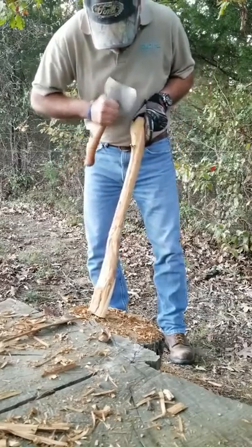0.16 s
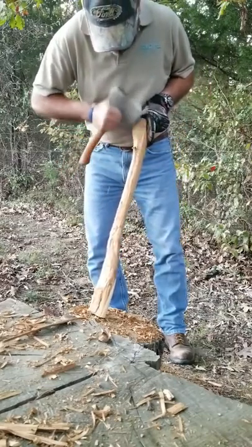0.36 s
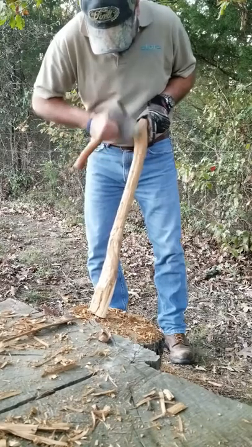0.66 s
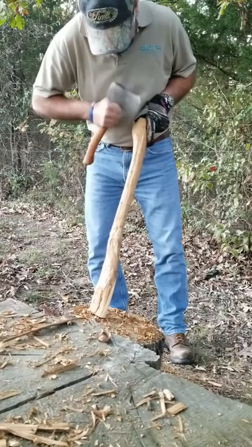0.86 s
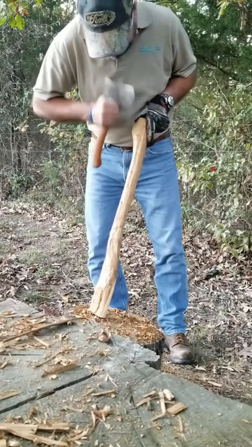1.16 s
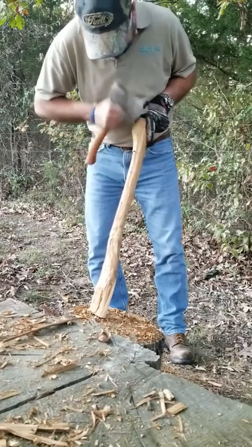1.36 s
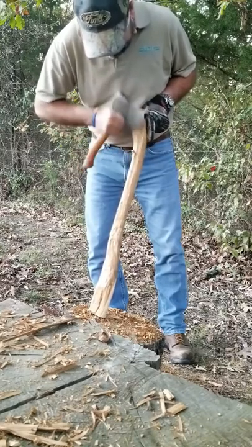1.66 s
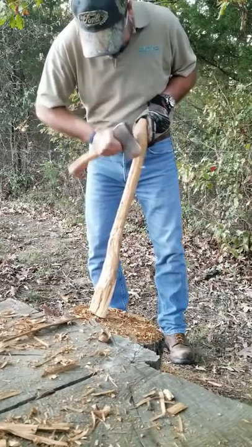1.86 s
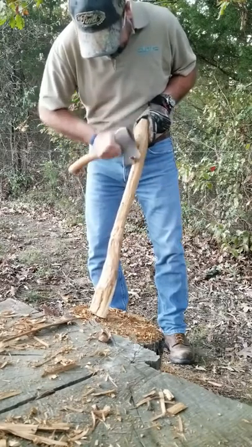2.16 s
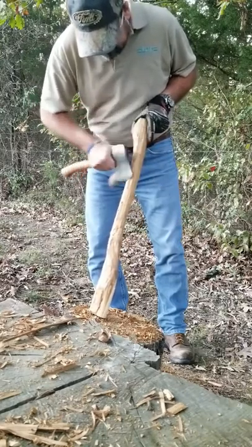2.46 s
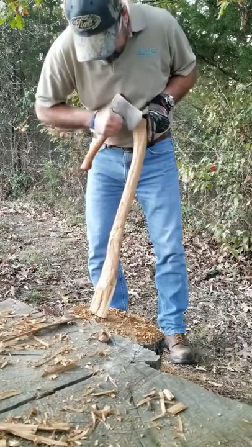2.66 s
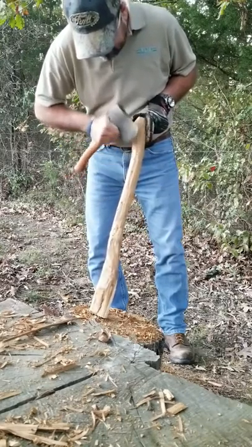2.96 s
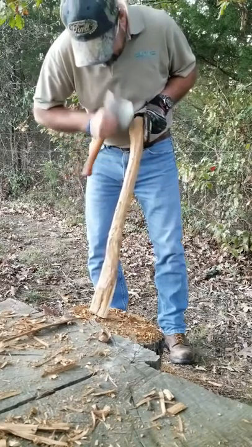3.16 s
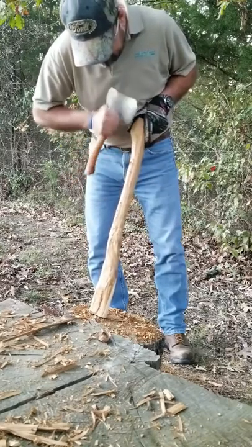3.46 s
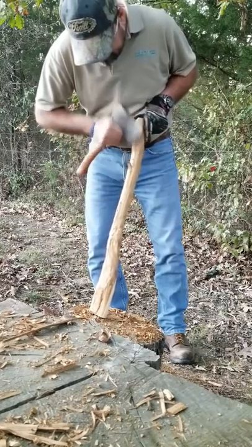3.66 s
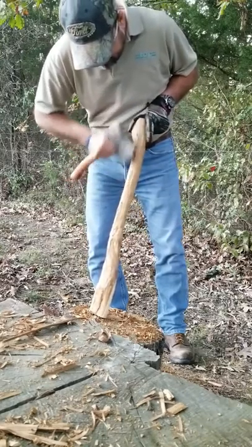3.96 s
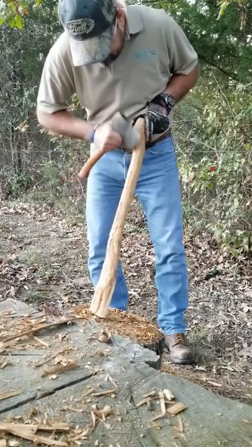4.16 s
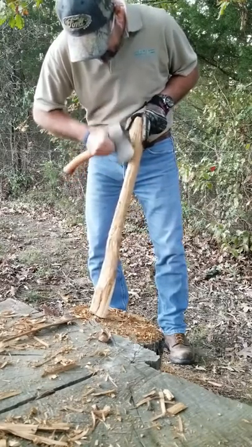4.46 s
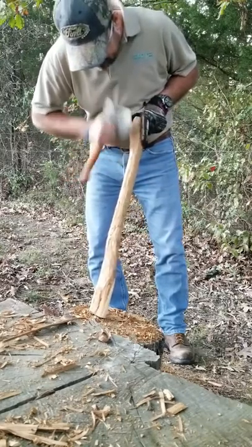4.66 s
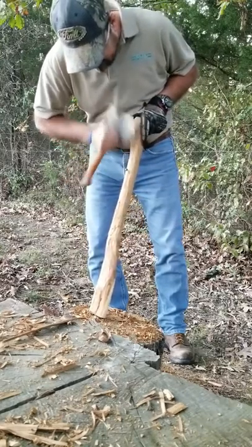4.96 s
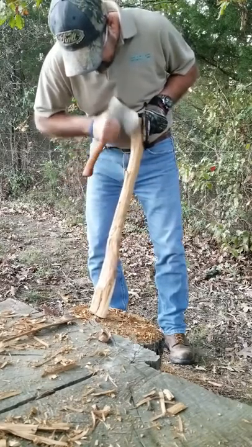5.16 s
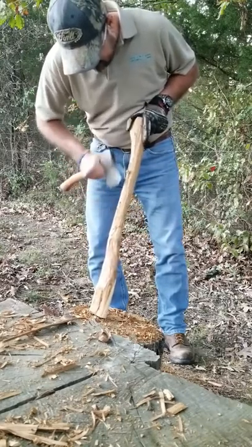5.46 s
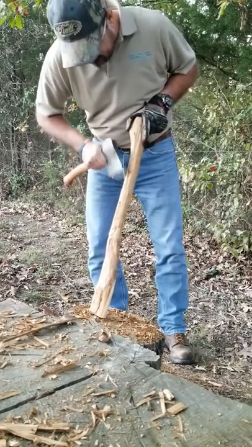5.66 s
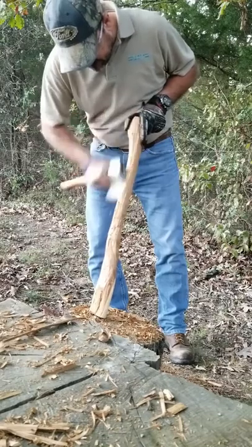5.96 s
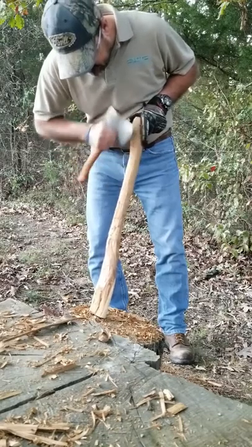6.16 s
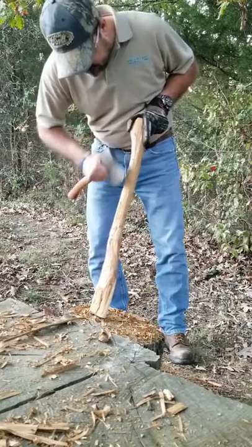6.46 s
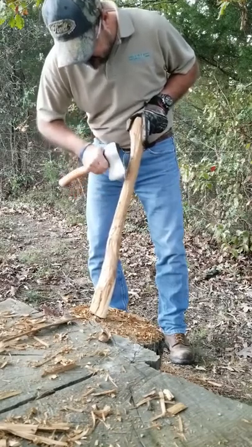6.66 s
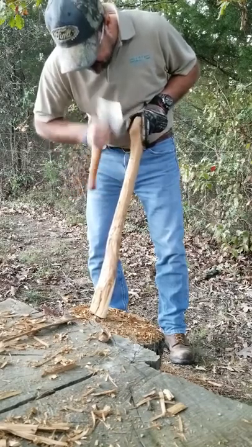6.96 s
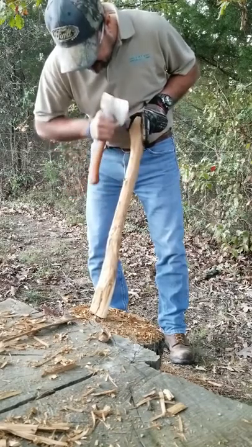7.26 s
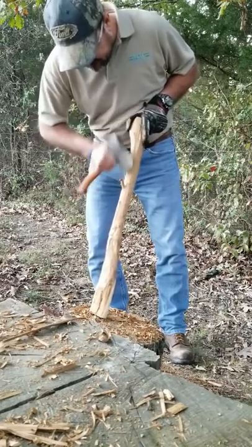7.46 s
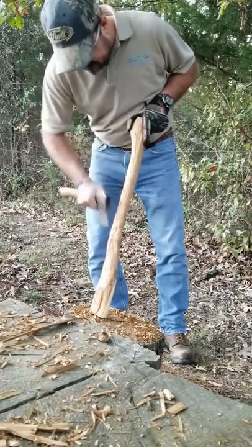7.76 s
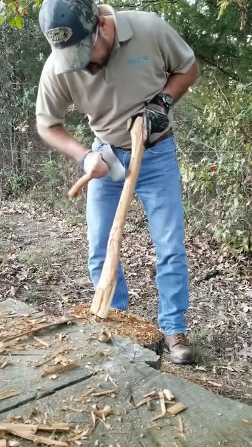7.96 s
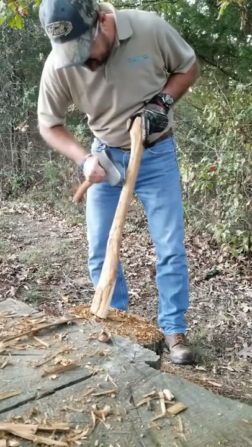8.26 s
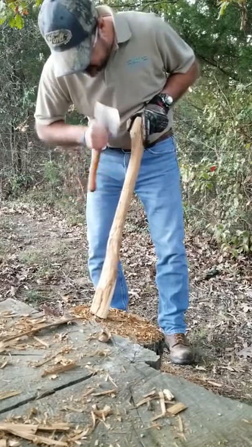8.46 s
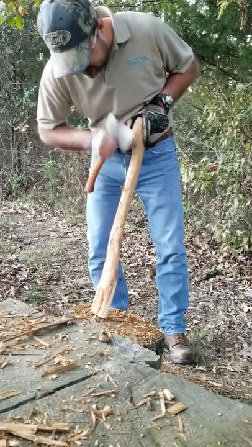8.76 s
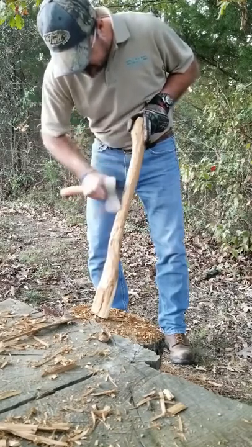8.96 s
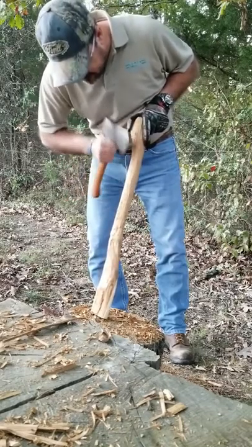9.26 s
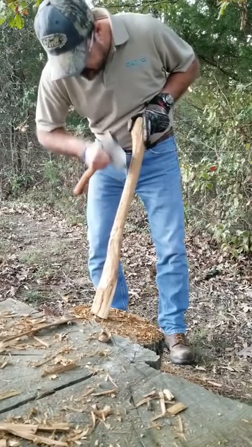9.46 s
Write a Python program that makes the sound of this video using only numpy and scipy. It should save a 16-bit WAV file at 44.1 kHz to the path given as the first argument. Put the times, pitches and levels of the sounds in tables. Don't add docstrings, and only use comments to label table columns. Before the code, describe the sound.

Outdoors among trees, a hatchet trims a dry hardwood pole standing on a stump. Sharp, woody whacks come about three a second in short runs with brief gaps. Each cracks fibres, rings pole and steel briefly, thumps the stump and scatters a short echo. Chips tick into dry leaves, crickets trill faintly, and distant traffic and a fading engine hum lie beneath. Close phone-like stereo microphones, slight hiss.

```python
import sys
import numpy as np
from scipy import signal
from scipy.io import wavfile
from scipy.ndimage import uniform_filter1d

SR = 44100
rng = np.random.default_rng(int(sys.argv[2]) if len(sys.argv) > 2 else 0)


def decibels_to_gain(level_db):
    exponent = np.asarray(level_db, float) / 20
    return 10 ** exponent


def wrap_up_sound(samples):
    columns = np.atleast_2d(samples).T
    tamed = np.clip(columns, -1, 1)
    steps = np.round(tamed * 32767).astype(np.int16)
    wavfile.write(sys.argv[1], SR, steps)


N = 423360

# f/Hz, correlation/-1..1
LIKENESS = [(60, 0.98), (130, 0.94), (290, 0.93), (640, 0.66), (1410, 0.69), (3100, 0.09), (6820, -0.08),
            (15000, -0.42)]
# f/Hz, left over right/dB
PORT_SHADE = [(300, 9.5), (1300, -1.5), (2400, 0), (4400, 4), (6000, 6.5), (8000, 12.5), (10000, 15),
              (12500, 14.5), (15000, 24)]
# f/Hz, level/dB, t60/s, left over right/dB
POLE_MODES = [(1217.7, -8.5, 0.076, -12), (1374, -8.5, 0.036, 7.5), (1019, -4.5, 0.0041, 6.5),
              (1600, -12.5, 0.0073, 0.5)]
UPPER_MODES = [(1790, 1.5, 0.047, -1.5), (2003, -14.5, 0.12, -5), (2140, -13, .04, 12),
               (2615, -13.5, 0.077, 1.5), (3220, -13, 0.048, -4)]
STEEL_MODES = [(7723, -4, 0.043, 20), (8000, -7, 0.037, 14)]
# f/Hz, level/dB per Hz
CRACK_COLOUR = [(880, -34.5), (1500, -8.5), (1820, -3.5), (2400, -18.5), (2700, -11.5), (2940, -16),
                (4630, -5.5), (6360, -21.5), (7890, -20.5), (9500, -42.5), (12400, -76), (20900, -120)]
# f/Hz, level/dB per Hz
SPLINTER_COLOUR = [(8000, -30.5), (9500, -2.5), (12000, 7), (15600, -3.5), (16600, -26.5)]


def evened(x):
    return x / np.sqrt(np.mean(x ** 2) + 1e-20)


def read(points, hz):
    f, value = np.transpose(points)
    return np.interp(np.log(hz + 1), np.log(f + 1), value)


def add(mix, s, sound):
    at = round(s * SR)
    part, sound = mix[:, max(at, 0):], sound[:, max(-at, 0):]
    count = min(part.shape[1], sound.shape[1])
    part[:, :count] += sound[:, :count]


def coloured(x, points, scale=1):
    hz = abs(np.fft.fftfreq(2 ** 11, 1 / SR))
    log_gain = scale * read(points, hz) * np.log(10) / 20
    response = np.exp(np.conj(signal.hilbert(log_gain)))
    taps = np.fft.ifft(response).real[:2 ** 10]
    return signal.oaconvolve(x, taps)[:len(x)]


def at_ports(x):
    return np.array([coloured(x, PORT_SHADE, .5), coloured(x, PORT_SHADE, -.5)])


def crackle(count, per_s):
    size = decibels_to_gain(3 * np.minimum(rng.exponential(1, count), 3))
    snaps = size * (rng.random(count) < per_s / SR)
    return evened(rng.standard_normal(count) * (.5 + snaps))


def diffuse(hz, frames, least_likeness):
    a, b, c, d = rng.standard_normal((4, len(hz), frames))
    same = np.clip(read(LIKENESS, hz), least_likeness, 1)
    left, other = a + 1j * b, c + 1j * d
    return np.array([left, same * left + np.sqrt(1 - same ** 2) * other])


def ring(modes, t, rise_s):
    hz, db, t60, pan_db = np.transpose(modes)[:, :, None]
    a, b, c = rng.standard_normal((3, len(modes), 1))
    hz, db = hz * (1 + .01 * b), db + 1.8 * a
    lag = np.minimum(hz / 1200, .6) * (.6 + .4 * c)
    size = decibels_to_gain(db - 60 * t / t60) * (1 - np.exp(-t / rise_s))
    turn = 2 * np.pi * hz * t
    left = size * decibels_to_gain(pan_db / 2) * np.sin(turn)
    right = size * decibels_to_gain(-pan_db / 2) * np.sin(turn - lag)
    return np.array([left.sum(0), right.sum(0)])


def traffic_and_hiss():
    # f/Hz, level/dB per Hz
    traffic_colour = [(20, -9), (40, -6.5), (85, 2), (125, -5.5), (190, -6), (260, -16), (400, -13),
                      (520, -12), (680, -8), (870, -9), (1050, -21.5), (1230, -20.5), (1400, -36),
                      (3000, -46.5)]
    # t/s, level/dB
    traffic_swell = [(0.0, -57), (1.47, -59), (2.03, -58), (2.75, -62.5), (3.23, -58.5), (4.33, -62),
                     (4.87, -61), (6.9, -61), (7.19, -61), (8.26, -63), (8.53, -62), (9.6, -60)]
    # f/Hz, level/dB per Hz
    hiss_colour = [(2500, -128), (5000, -128), (9000, -128), (15500, -126), (16600, -140)]
    frames, hz = N // 256 + 5, np.fft.rfftfreq(1024, 1 / SR)[:, None]
    patches = rng.standard_normal((len(hz), frames))
    patches = evened(uniform_filter1d(uniform_filter1d(patches, 5, 0), 20, 1))
    s, swell = np.transpose(traffic_swell)
    swell_db = np.interp(np.arange(frames) * 256 / SR, s, swell - swell.mean())
    rumble_db, roar_db = -63 + 1.5 * swell_db, -66.5 + .9 * swell_db
    share = np.clip(np.log2(hz / 220 + 1e-9), 0, 1)
    level_db = (1 - share) * rumble_db + share * roar_db
    road = decibels_to_gain(read(traffic_colour, hz) + level_db + 1.5 * patches) * (hz < 3000)
    size = np.hypot(road, decibels_to_gain(read(hiss_colour, hz) + 25))
    noise = signal.istft(diffuse(hz, frames, -1) * size, nperseg=1024, noverlap=768)[1]
    return noise[:, :N] * decibels_to_gain([[.8], [-.8]])


def engine_drone():
    # t/s, level/dB
    drone_level = [(0, -71), (1, -65), (2.3, -74.5), (3.3, -76.5), (9.6, -81)]
    # f/Hz, level/dB
    drone_tones = [(193, 1.5), (470, -3.5)]
    waver = 1 + 0.022 * evened(uniform_filter1d(rng.standard_normal(N), 9000))
    seconds = np.cumsum(waver) / SR
    drone = sum(decibels_to_gain(db) * np.sin(2 * np.pi * f * seconds) for f, db in drone_tones)
    return drone * decibels_to_gain(np.interp(np.arange(N) / SR, *np.transpose(drone_level)))


def trill(length_s, hz, per_s, db, blur, warm_up):
    t = np.arange(0, length_s, 1 / SR)
    stroke = (t * per_s) % 1
    pulses = np.sin(np.pi * np.clip(stroke / .6, 0, 1))
    pitch = hz * (1 - warm_up * np.exp(-t / .12))
    glide = pitch * (1 - 0.013 * (stroke - .3))
    clear = np.sin(2 * np.pi * np.cumsum(glide) / SR + np.array([[0], [1.5]]))
    drift = rng.standard_normal((2, 2, SR))[..., :len(t)]
    drift = uniform_filter1d(uniform_filter1d(drift, size=220), size=220)
    turn = 2 * np.pi * np.cumsum(pitch) / SR
    fuzzy = evened(drift[0] * np.sin(turn) + drift[1] * np.cos(turn))
    mush = np.clip(blur + .4, 0, 1)
    song = (1 - mush) * clear * pulses + mush * fuzzy * (.5 + .5 * pulses)
    fade_s = np.minimum(.3 * blur ** 2 + .002, .15)
    fade = np.clip(np.minimum(t, t[-1] - t) / fade_s, 0, 1)
    return decibels_to_gain(db) * evened(song) * fade


def crickets():
    # f/Hz, level/dB
    chorus = [(3708, -81.5), (3984, -86.5)]
    # f/Hz, trill length/s, blur of distance/0..1
    far_singers = [(4090, .42, .25), (3890, .45, .2), (3860, .52, .4), (4040, .5, .5)]
    far_levels = [-71, -68, -74.5, -76]
    far_starts = [(2.82, 5.4, 8.35), (2.81, 5.55, 8.26), (2.4, 4.5, 7.2, 9.4), (.3, .75, 3.3, 6.1, 9.26)]
    # f/Hz, pulse rate/Hz, trill length/s, trill starts t/s
    near_singers = [(3910, 36.3, .363, (1.055, 3.682, 6.832)),
                    (3740, 33.4, .495, (1.3, 3.771, 6.096, 8.781))]
    near_levels = [-61, -64.5]
    out, far_per_s = np.zeros((2, N)), 33.4
    for hz, db in chorus:
        for s in np.arange(-.2, N / SR, .8):
            add(out, s, trill(.95, hz, far_per_s, db, .8, 0))
    for (hz, length_s, blur), db, starts in zip(far_singers, far_levels, far_starts):
        for s in starts:
            add(out, s, trill(length_s, hz, far_per_s, db, blur, .022))
    for (hz, per_s, length_s, starts), db in zip(near_singers, near_levels):
        for s in starts:
            add(out, s, trill(length_s, hz, per_s, db, -.22, 0))
    return out


def trees(place, deeper_db):
    # f/Hz, level/dB per Hz
    echo_colour = [(250, -10), (700, -22.5), (1050, -6.5), (1200, -3.5), (1400, -8), (1780, -8),
                   (2300, -10.5), (2640, -18), (2900, -16), (3500, -9.5), (4800, -18), (6400, -32),
                   (7700, -27), (9400, -41)]
    echo_top = [(15300, -30), (16600, -50)]
    # f/Hz, t60/s
    tree_decay = [(150, 0.63), (600, 0.16), (1200, 0.53), (2500, .45), (4000, 0.48), (8000, 0.23),
                  (14000, 0.44)]
    # f/Hz, level/dB, extra for a high blow/dB
    lingering = [(1157, 7.5, -3.5), (1777, 8.5, 6), (2690, 6.5, 3), (3520, 5.5, -1.75), (7650, 9, 0.5)]
    hz, t = np.fft.rfftfreq(1024, 1 / SR)[:, None], np.arange(88) * 256 / SR
    level_db = read(echo_colour + echo_top, hz) - 60 * (t - .12) / read(tree_decay, hz)
    patches = uniform_filter1d(rng.standard_normal((len(hz), len(t))), size=8, axis=0)
    level_db += 3 * evened(uniform_filter1d(patches, size=8, axis=1))
    level_db += .1 * deeper_db * np.log2(np.clip(hz / 2000, 1, 8))
    for f, db, high_db in lingering:
        level_db += (db + high_db * place) / (1 + ((hz - f) / 35) ** 2)
    shade_db = np.array([.2, -.2])[:, None, None] * read(PORT_SHADE, hz)
    z = diffuse(hz, len(t), 0) * decibels_to_gain(level_db - 3.5 + shade_db)
    tail = signal.istft(z, nperseg=1024, noverlap=768)[1]
    return tail * (1 - np.exp(-(np.arange(tail.shape[1]) / SR / 0.0027) ** 2))


def chop(t, force_db, thump_db, place):
    # f/Hz, level/dB, t60/s, left over right/dB
    lower_modes = [(1113, 9.5, 0.037, 7.5), (1050, -3.5, .025, 6)]
    whole_modes = [(1202, -29, 0.3, -6.5), (1708, -34.5, .35, -1)]
    stump_modes = [(140.7, 9.5, 0.068, -1.5), (218, -1.5, 0.048, -7.5)]
    cut_s, land_s = .00035, .0015
    late = np.maximum(t - cut_s, 0)
    hold_s = np.clip(0.056 + 0.12 * max(-place, 0), .03, .16)
    grip = decibels_to_gain(60 * t / 0.078 - 60 * t / hold_s)
    wood = ring(POLE_MODES, late, 0.00065) * grip
    wood += decibels_to_gain(-14.5 - 0.5 * place) * ring(lower_modes, late, 0.0016)
    wood += decibels_to_gain(-7.5 + 7 * place) * ring(UPPER_MODES, late, .001)
    wood += decibels_to_gain(-3 * place) * ring(whole_modes, late, .01) * (1 - t / t[-1]) ** .5
    slap = np.exp(-((t - land_s) / 0.00046) ** 2) * np.cos(2 * np.pi * 1100 * (t - land_s))
    wood += decibels_to_gain(-5.5 + np.array([[2.], [-2.]])) * slap
    thump = ring(stump_modes, np.maximum(t - .006, 0), 0.025)
    return decibels_to_gain(force_db + 4.5) * wood + decibels_to_gain(thump_db + 11.0) * thump


def bite(t, crack_db, harder_db, deeper_db, place):
    # f/Hz, level/dB, t60/s, left over right/dB
    knock_modes = [(262, -16.5, 0.014, 1), (427, -3.5, 0.016, 3), (539, 8, 0.016, 3), (780, -2, 0.024, 7.5),
                   (913, -11.5, 0.038, -9)]
    knock_db = -24 + .35 * harder_db
    splinter_db = -39.5 + .3 * deeper_db
    steel_db = -30 + .4 * deeper_db + 8 * place
    entry = (t / .0009) * np.exp(1 - t / .0009) + .25 * np.exp(-t / .004)
    tearing = (1 - np.exp(-t / .005)) * decibels_to_gain(-60 * t / .08)
    crack = evened(coloured(crackle(len(t), 2500), CRACK_COLOUR)) * (entry + decibels_to_gain(-9) * tearing)
    splinters = evened(coloured(crackle(len(t), 2500), SPLINTER_COLOUR))
    splinters *= 0.9 * entry + 0.71 * tearing
    knock = decibels_to_gain(knock_db + 6.5) * ring(knock_modes, t, 0.0015)
    steel = decibels_to_gain(steel_db + 4) * ring(STEEL_MODES, t, 0.0001)
    return at_ports(decibels_to_gain(crack_db) * crack + decibels_to_gain(splinter_db) * splinters) + knock + steel


def fibre_snap(db):
    tick = evened(coloured(crackle(2000, 3000), SPLINTER_COLOUR))
    tick *= np.exp(-np.arange(2000) / SR / .003)
    return decibels_to_gain(db - 7.5) * at_ports(tick)


def bounce(t, pole_db, steel_db, crack_db):
    crack = evened(coloured(crackle(len(t), 2500), CRACK_COLOUR))
    crack *= (1 - np.exp(-t / 0.0024)) * np.exp(-t / 0.01)
    wood = ring(POLE_MODES, t, 0.00038) + 0.31 * ring(UPPER_MODES, t, 0.0007)
    wood *= np.exp(-t / 0.0063)
    steel = decibels_to_gain(steel_db + 10.0) * ring(STEEL_MODES, t, 0.00034)
    return decibels_to_gain(pole_db + 3) * wood + steel + decibels_to_gain(crack_db - 1.5) * at_ports(crack)


def hatchet():
    # t/s, force level/dB, bite of the edge level/dB, push into the stump level/dB,
    # place on the pole/-1 low..1 high
    blows = [(0.2381, -14, -19.5, -26.5, -0.039), (0.553, -12.5, -16, -31.5, 0.12),
             (1.234, -13.5, -24.5, -39, 0.069), (1.5357, -11.5, -18.5, -30.5, -0.075),
             (1.8251, -13, -20.5, -28.5, 0.51), (2.1129, -12, -15.5, -26, 0.35),
             (2.4244, -19, -15, -41.5, .8), (3.223, -14.5, -28, -34, .1), (3.533, -14, -17, -35.5, 0.32),
             (3.8319, -15.5, -19.5, -34, 0.46), (4.7125, -19.5, -30.5, -38.5, -0.18),
             (5.0046, -15.5, -19, -27, -0.05), (5.2834, -21.5, -25.5, -38, -.9),
             (5.9456, -16.5, -28, -43.5, -0.81), (6.2955, -15.5, -21, -42, -0.88),
             (7.0256, -13, -20.5, -35, 0.13), (7.353, -14, -16.5, -35, -0.37),
             (7.693, -13, -15, -47.5, -0.31), (8.6, -13, -15, -38.5, 0.23),
             (8.9203, -12, -17.5, -40, -0.081)]
    # t/s, level/dB
    ticks = [(0.2421, -34), (0.5592, -25), (0.5916, -57.5), (1.2374, -25), (1.266, -44.5),
             (1.8354, -28.5), (2.124, -21.5), (2.4329, -36), (2.438, -19.5), (3.546, -24),
             (4.7205, -27), (5.0116, -22.5), (5.278, -40.5), (7.3692, -26), (7.702, -26.5),
             (8.9377, -28.5)]
    # t/s, pole ring level/dB, steel ring level/dB, crack level/dB
    second_touches = [(2.119, -12, -35, -24), (4.232, -56, -80, -67.5), (5.299, -14.5, -34.5, -29),
                      (5.332, -25, -48.5, -42.5), (5.9526, -23.5, -40.5, -49), (5.9662, -13, -45, -52.5),
                      (6.3141, -10.5, -39.5, -42), (6.3339, -21.5, -51, -47), (7.3593, -17, -40.5, -35.5),
                      (7.7286, -21.5, -53, -33.5), (8.9394, -17.5, -41.5, -53.5)]
    out, echo, t = np.zeros((2, N)), np.zeros((2, N)), np.arange(SR // 4) / SR
    add(echo, -.09, decibels_to_gain(-64) * trees(0, 0))
    for s, force_db, bite_db, thump_db, place in blows:
        harder_db, deeper_db = force_db + 14, bite_db + 20
        blow = chop(t, force_db, thump_db, place) + bite(t, bite_db, harder_db, deeper_db, place)
        add(out, s - .0012, blow)
        echo_db = -10.5 + .4 * harder_db + .25 * deeper_db
        add(echo, s, decibels_to_gain(echo_db - 50) * trees(place, deeper_db))
    for s, db in ticks:
        add(out, s - .0005, fibre_snap(db))
    for s, *levels in second_touches:
        add(out, s - .001, bounce(t, *levels))
    out = signal.lfilter(*signal.butter(2, 80, "high", fs=SR), out)
    return np.array([out[0], np.roll(out[1], 2)]) + echo


def chips():
    # t/s, peak level/dB, length/s
    landings = [(0.7692, -50.5, 0.014), (2.7307, -47, 0.017), (4.0846, -62, 0.03), (4.2494, -65, 0.034),
                (7.8357, -44, 0.018), (7.9728, -62.5, 0.03), (8.0037, -50, 0.028), (8.087, -52, 0.037),
                (9.181, -62, 0.021), (6.271, -47.5, .02)]
    # f/Hz, level/dB per Hz
    leaf_colour = [(710, -33.5), (1200, 0.5), (3150, -8.5), (3970, 0.5), (6500, -0.5), (9230, -7),
                   (12500, -4), (16000, -4), (16500, -31)]
    out, t = np.zeros((2, N)), np.arange(SR // 6) / SR
    for s, db, length_s in landings:
        shape = (1 - np.exp(-t / 0.00084)) * np.exp(-t / np.clip(length_s, .003, .08))
        rustle = np.array([evened(coloured(crackle(len(t), 1500), leaf_colour)) for port in range(2)])
        add(out, s - .002, decibels_to_gain(db - 9.0 + np.array([[3], [-3]])) * rustle * shape)
    return out


def skid():
    # t/s, f/Hz, level/dB
    course = [
        (7.76, 144, -46),
        (7.778, 140, -46.5),
        (7.85, 87.4, -51),
        (7.9, 73.7, -57),
    ]
    s, hz, db = np.transpose(course)
    t = np.arange(s[0], s[-1], 1 / SR)
    judder = np.sin(2 * np.pi * np.cumsum(np.interp(t, s, hz)) / SR)
    band = signal.butter(2, [180, 800], "band", fs=SR)
    scrape = evened(signal.lfilter(*band, crackle(len(t), 250)))
    out = np.zeros((2, N))
    add(out, s[0], np.ones((2, 1)) * decibels_to_gain(np.interp(t, s, db)) * (judder + 0.59 * scrape))
    return out


def scene():
    return traffic_and_hiss() + engine_drone() + crickets() + hatchet() + chips() + skid()


def top_cut(x):
    return signal.sosfilt(signal.butter(12, 16810, fs=SR, output="sos"), x)


def record(dry):
    thin = signal.lfilter(*signal.butter(3, 42, "high", fs=SR), dry)
    soft = np.tanh(thin / 1.3) * 1.3
    return top_cut(soft)


dry = scene()
out = record(dry)
wrap_up_sound(out)
```